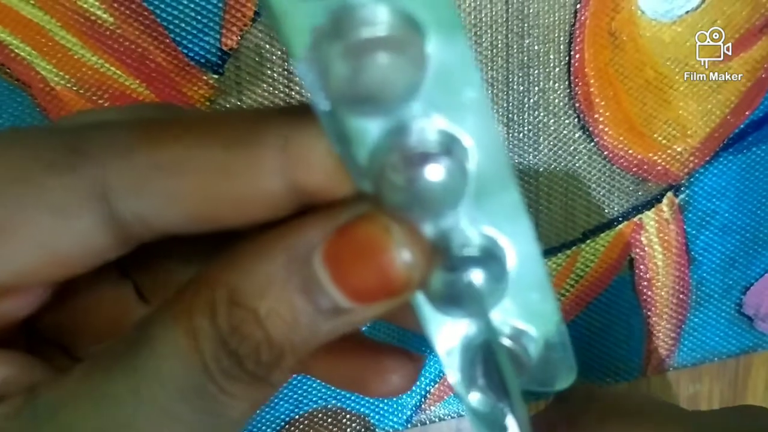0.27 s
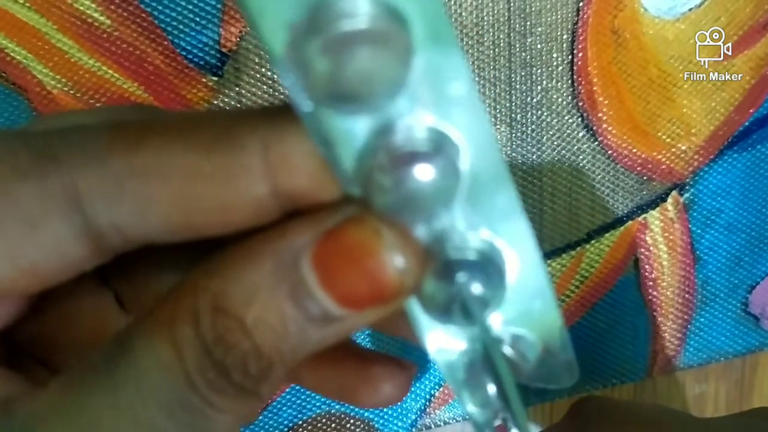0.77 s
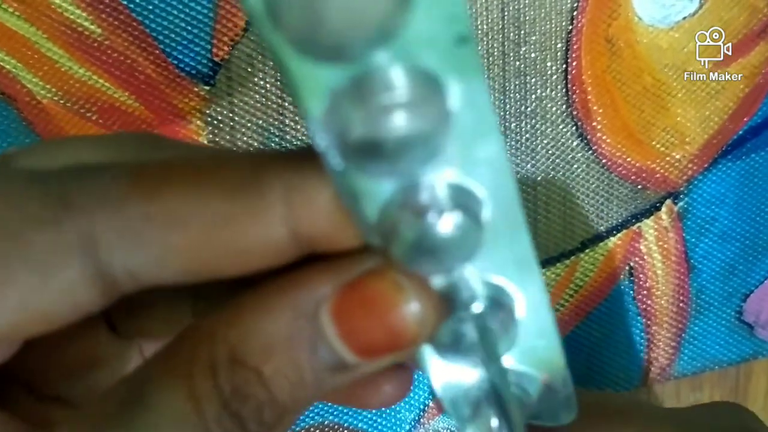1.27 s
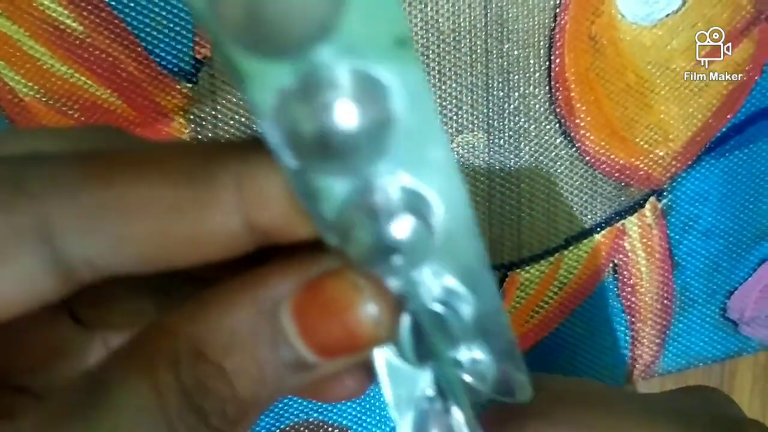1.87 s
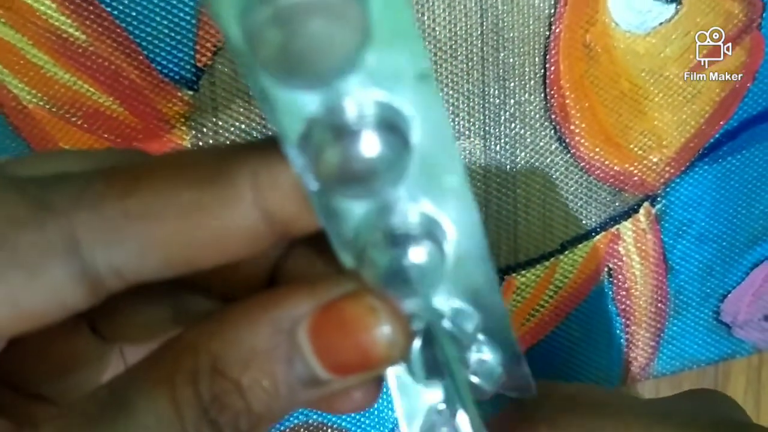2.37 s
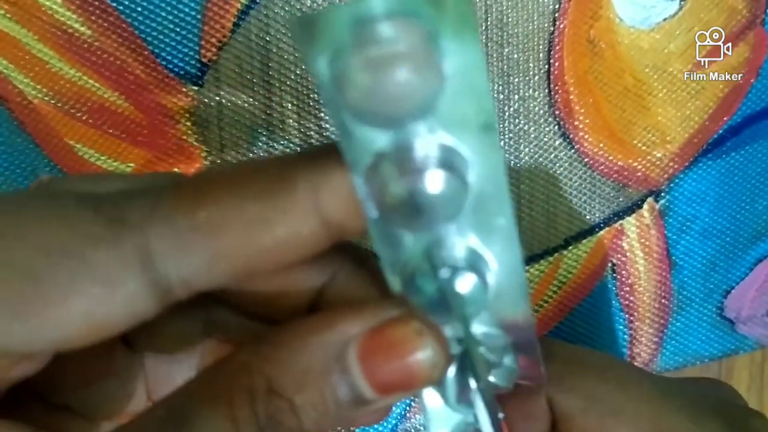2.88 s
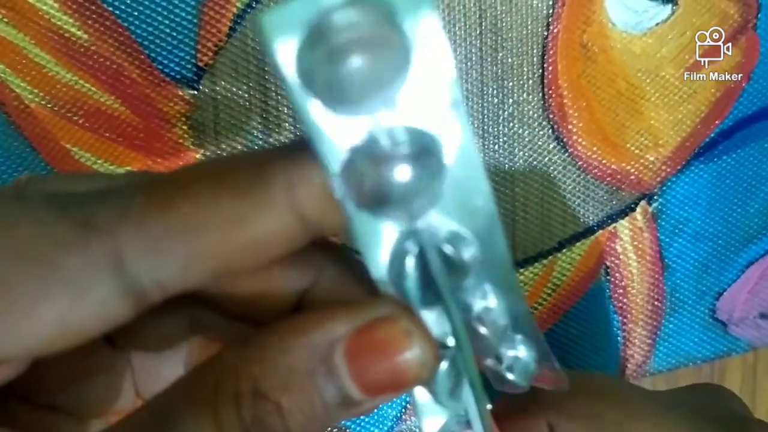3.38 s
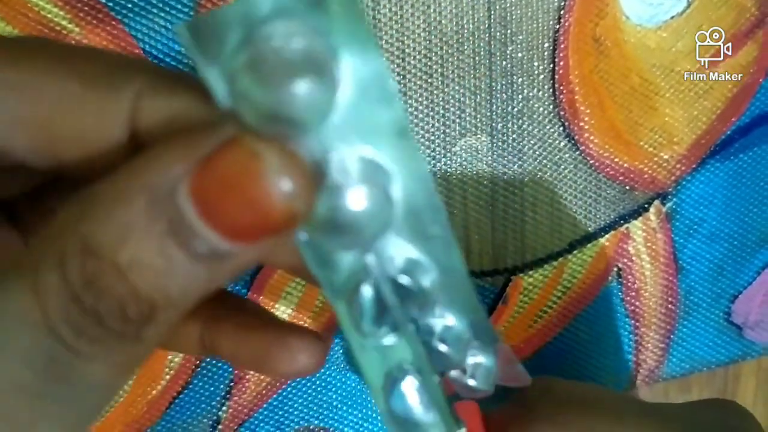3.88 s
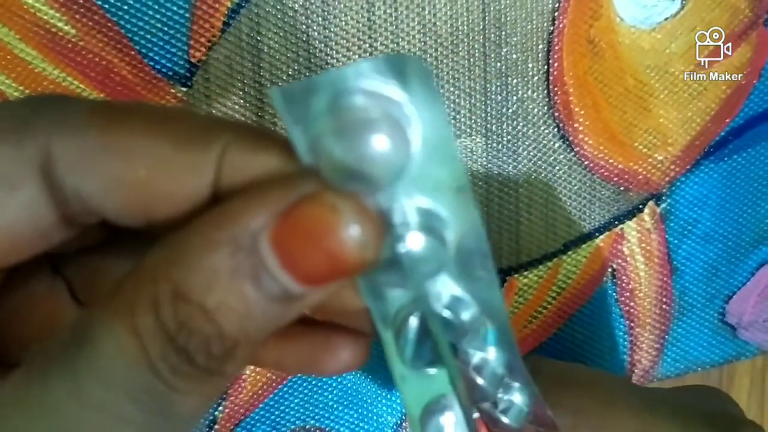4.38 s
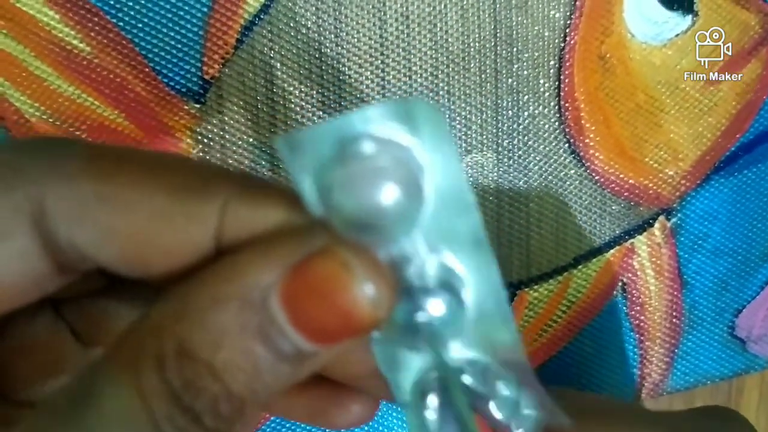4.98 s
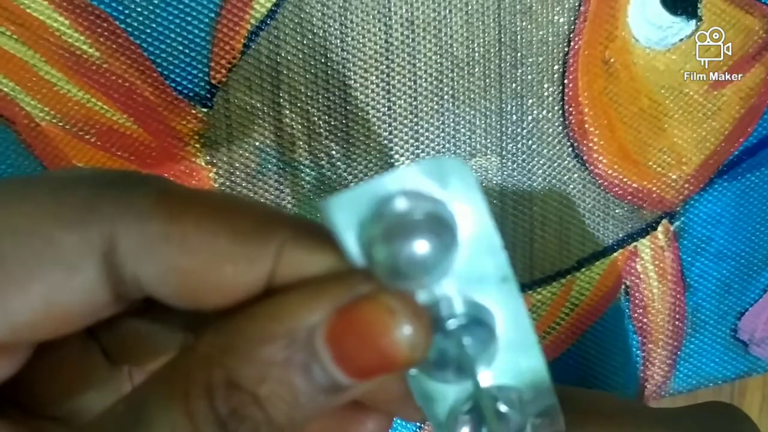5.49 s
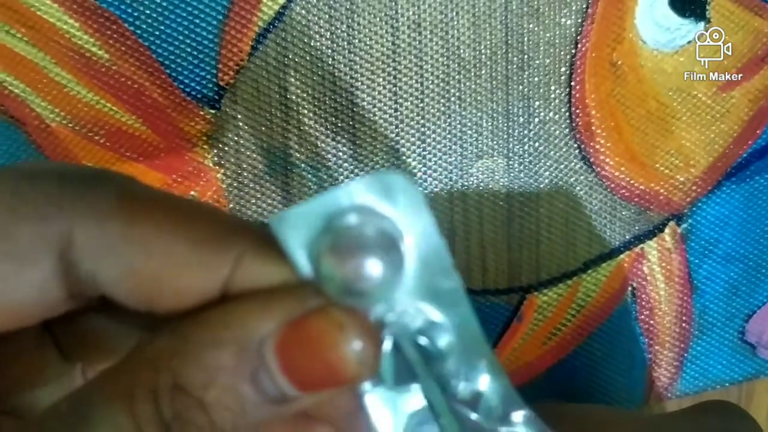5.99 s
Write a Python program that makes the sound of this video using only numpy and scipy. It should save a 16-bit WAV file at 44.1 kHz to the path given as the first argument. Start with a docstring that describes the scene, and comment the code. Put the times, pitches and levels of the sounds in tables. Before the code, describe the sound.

Close, irregular plastic cracks, foil ticks and brief blade scrapes as scissors cut a blister pack in a quiet small room.

```python
"""Scissors through a blister strip

A small room, a phone's stereo microphone a hand's width from a foil and plastic blister strip.
The plastic gives way in sharp, dry snaps and its domes ping as they buckle. The blades scrape in
short gritty strokes, the foil ticks, the pivot squeaks once. The room answers briefly, over soft
noise and a faint mains hum."""
import sys
import numpy as np
from scipy import signal
from scipy.fft import rfft, irfft, next_fast_len
from scipy.io import wavfile
from scipy.ndimage import uniform_filter1d, map_coordinates

SR = 44100
rng = np.random.default_rng(int(sys.argv[2]) if len(sys.argv) > 2 else 0)


def unload_wav(signal):
    """Save mono or channel-first audio to the path in sys.argv[1] as 16-bit WAV at rate SR, clipped to [-1, 1]."""
    wavfile.write(
        sys.argv[1],
        SR,
        np.round(np.clip(np.atleast_2d(signal).T, -1, 1) * 32767).astype(np.int16),
    )


N = 275095
TIME = np.arange(N) / SR


# Cracks in the plastic, a hand's width from the microphone:
# t/s, level/dB, knock/dB, flex/dB, foil brightness/dB, left-right/dB, tear length/s
PLASTIC_SNAPS = [(0.108, -41, -13, -1, -8, -1, 0.0042), (0.682, -43.5, -21, -11.5, -1, 5, 0.0014),
                 (0.749, -10, -18, -9.5, 0, 2.5, 0.0023), (0.8634, -32, -12.5, -14, -2, -2.5, 0.0048),
                 (0.8716, -11.5, -29, -17, -20, 1, 0.00049), (1.048, -39.5, -15, -14, -11, 4, 0.0028),
                 (1.4054, -54, -4, -5, -2, -2, 0.00046), (1.4287, -45, -16, -11, -8, 4, 0.00058),
                 (1.4633, -57, -7, -1, -10, -1, .0005), (1.84, -55, -12, -4.5, -15, -2, .0008),
                 (1.934, -49, -17.5, -7, -17, -2, .0007), (2.0144, -16, -41.5, -21, -5, 0, .0013),
                 (2.0181, -10.5, -41, -24, -9.5, 3.5, 0.0013), (2.0274, -11.5, -36.5, -18, -10, -3, 0.001),
                 (2.2893, -7, -23, -17.5, -11.5, 0.5, 0.00036), (2.5325, -43, -9.5, -3.5, -1, -9, 0.00074),
                 (2.548, -18, -25.5, -14, -18, 5, 0.00059), (2.5607, -33, -7.5, -10, -3, 0, .0019),
                 (2.6554, -16.5, -41, -11.5, -10, 2.5, 0.001), (2.7811, -17.5, -28.5, -17, -6, 2, 0.00041),
                 (3.101, -34.5, -30, -19.5, -22.5, 0, .004), (3.4032, -30.5, -27, -15, -10, 7, 0.00074),
                 (3.6119, -52.5, -11, -13.5, -6, 0, .002), (4.204, -36, -16.5, -11, -3.5, -2.5, 0.0037),
                 (4.215, -30, -26, -11.5, -7, 1, .003), (4.2582, -6.5, -24.5, -9.5, -3.5, 0.5, 0.0054),
                 (4.4134, -38.5, -23, -11, -11, 6, 0.0011), (4.4375, -32.5, -22, -13, -27, 2, .0011),
                 (4.4532, -34.5, -23.5, -2.5, -14, 4, .0018), (4.5651, -41.5, -8, -10, -21, -1, .0004),
                 (4.5727, -36.5, -14, -6.5, -14, 3, 0.0013), (4.6135, -28, -28.5, -17.5, 6, 6, .0007),
                 (4.635, -18.5, -24.5, -14, -8, -3.5, 0.0028), (4.8351, -36, -23, -12, -9, -3, 0.0024),
                 (4.8939, -53.5, -8, 4, -10, 2, .0012), (4.9191, -44.5, -16, -5.5, -9, -3, .0008),
                 (4.9364, -38, -20, -9, -19, 1, 0.00054), (4.9761, -33, -33, -13, -4, -7, .0012),
                 (4.985, -28, -35, -10, 3, 3, 0.0018), (4.996, -24, -22, -10, -13, -1.5, 0.0015),
                 (5.1661, -32, -21.5, -13, -7.5, 0.5, 0.0019), (5.204, -48, -10, -2, -13, 3, .003),
                 (5.2764, -23.5, -20, -7, -17.5, 4, .0021), (5.3151, -16.5, -24.5, -15, -6, 0.5, 0.0007),
                 (5.8072, -37.5, -27, -8.5, -10, 0, 0.00087), (5.8246, -31, -17.5, -8.5, -9, 1.5, 0.0006),
                 (6.0985, -39.5, -10, -9.5, -19.5, -4, 0.0011)]
# What a crack radiates: f/Hz, level/dB
CRACK_SPECTRUM = [(25, -11.5), (70, 2.5), (350, -2), (900, 12), (1400, 6), (2300, -1), (4200, 3),
                  (5200, -7), (6600, -6), (7600, -3.5), (9000, 0.5), (12000, 2.5), (15500, -8),
                  (17000, -12)]

def snaps(room_db=-2, size=2048):
    """Each crack or tick mixes low knock, flexing plastic and bright foil; gives (to mic, to room)."""
    to_mic, to_room = np.zeros((2, 2, N))
    hz = np.fft.rfftfreq(size, 1 / SR)
    for s, db, knock_db, flex_db, foil_db, pan_db, length in PLASTIC_SNAPS + foil_ticks():
        tone = [(1600, knock_db), (2200, flex_db), (4300, flex_db),
                (5600, 0.33), (10000, 0.0061), (12800, foil_db)]
        colour_db = 23.5 + along(CRACK_SPECTRUM, hz) + along(tone, hz) + folds(hz)
        crack = irfft(tear(length, size) * causal(amp(db + colour_db)))
        add(to_mic, s, crack * amp([[pan_db / 2], [-pan_db / 2]]))
        add(to_room, s, crack * amp(room_db))
    return to_mic, to_room


def tear(length, size, t60=0.01, shared_hz=300):
    """Stereo spectrum of one crack: it gathers speed, runs its length, then the sheet damps it."""
    t, hz = np.arange(size) / SR, np.fft.rfftfreq(size, 1 / SR)
    onset = 1 - np.exp(-t / (.3 * length))
    decay = amp(-60 * np.maximum(t - length, 0) / t60)
    mid, side = rfft(rng.standard_normal((2, size)) * onset * decay)
    burst = mid + np.outer([1, -1], hz / (hz + shared_hz)) * side  # long waves reach both ports alike
    # so short a break excites all pitches about equally
    power = np.abs(uniform_filter1d(np.abs(burst) ** 2, size=36))
    return burst * causal(1 / np.sqrt(power + 1e-12))


def folds(hz, spacing_hz=330, depth_db=3):
    """The sheet buckles into a new shape each time, so its resonances fall at new pitches (dB)."""
    knots = rng.standard_normal(SR // spacing_hz)
    return depth_db * map_coordinates(knots, [hz / spacing_hz]) * hz / (hz + 4 * spacing_hz)


# Blister domes buckling, each at its own pitch: t/s, level/dB, f/Hz
DOME_POPS = [(.7492, -11, 6680), (2.2899, -17.5, 4230), (2.548, -41.5, 957), (2.562, -42, 834),
             (2.6558, -30.5, 3440), (2.7806, -18, 10950), (3.741, -56, 1150), (4.26, -30.5, 1052),
             (4.997, -46.5, 778), (5.278, -46, 770), (6.099, -53, 1100)]

def dome_pops(t60_cycles=49):
    """Buckling blisters ring: small stiff folds ping briefly, wide domes sound hollow and longer."""
    out, t = np.zeros(N), np.arange(SR // 4) / SR
    for s, db, hz in DOME_POPS:
        add(out, s, amp(db - 60 * t * hz / t60_cycles) * np.sin(2 * np.pi * hz * t))
    return out


# Blades rubbing the strip, close up: start t/s, hardest t/s, end t/s, level/dB, hollow tone/dB
BLADE_STROKES = [(.11, 0.137, 0.21, -46.5, -15.5), (.41, 0.496, .67, -81, 3), (.756, 0.77, 0.8, -35, -16),
                 (1.043, 1.071, 1.136, -36, -23), (1.23, 1.245, 1.262, -49, -16),
                 (1.359, 1.403, 1.57, -66.5, -7), (1.579, 1.626, 1.695, -55.5, -7),
                 (1.959, 2.01, 2.03, -32.5, -19), (2.297, 2.304, 2.34, -31, -32),
                 (2.438, 2.491, 2.49, -47, -12.5), (2.545, 2.548, 2.598, -36, -10.5),
                 (2.981, 2.992, 3.1, -61.5, -7), (3.091, 3.126, 3.209, -38, -20),
                 (3.258, 3.351, 3.356, -50, -13), (3.70, 3.748, 3.77, -53, -5),
                 (3.857, 3.902, 4.0, -67, -20.5), (4.194, 4.219, 4.316, -39, -14),
                 (4.38, 4.431, 4.49, -46.5, -13), (4.562, 4.567, 4.6, -48.5, -4.5),
                 (4.849, 4.944, 5, -52, -11), (4.969, 4.999, 5.015, -32, -22),
                 (5.07, 5.101, 5.12, -50, -13.5), (5.225, 5.261, 5.30, -38, -16),
                 (5.805, 5.817, 5.855, -48, -11), (5.971, 6.069, 6.06, -59.5, -8.5),
                 (6.098, 6.205, 6.25, -58, -31)]
# What the rubbing radiates: f/Hz, level/dB
SCRAPE_SPECTRUM = [(100, -18), (500, -23), (1000, -17), (1500, -20), (3200, -14.5), (4300, -8),
                   (5200, -7.5), (6500, -4), (9000, -0.5), (11500, -3.5), (15000, -11), (16500, -26)]

def blade_strokes(rise_s=0.0023, fall_s=0.0044, size=12000):
    """The edges grind through the foil, and the blisters hum along."""
    out, hz = np.zeros((2, N)), np.fft.rfftfreq(size, 1 / SR)
    for start, hardest, end, db, hollow_db in BLADE_STROKES:
        t = start - rise_s + np.arange(size) / SR
        gate = np.clip((t - start) / rise_s + .5, 0, 1) * np.clip((end - t) / fall_s + .5, 0, 1)
        force = gate * amp(force_db(t, start, hardest, end, db))
        grains = rfft(grit(size))
        edge = unit(irfft(grains * causal(amp(along(SCRAPE_SPECTRUM, hz) + folds(hz)))))
        body = unit(irfft(grains * hollow(hz)))
        add(out, start - rise_s, force * (edge + amp(hollow_db) * body))
    return out


def force_db(t, start, hardest, end, db, swell_db=16, ease_db=13.5):
    """The hand bears down, then eases off."""
    return db - np.interp(t, [start, hardest, end], [swell_db, 0, ease_db])


def grit(size, rough_db=4.6, grain_hz=800):
    """Stick and slip: noise broken into grains of very unequal size."""
    grains = map_coordinates(rng.standard_normal(size), [np.arange(size) * grain_hz / SR])
    return unit(rng.standard_normal((2, size)) * amp(rough_db * np.minimum(grains, 2)))


# Hollows of the blisters and the cupped hand: f/Hz, width/Hz, level/dB
CAVITIES = [(790, 240, -6.5), (1075, 300, -2)]

def hollow(hz):
    """Resonances of the air held by blisters and hand."""
    return sum((-1) ** k * amp(db) * 1j * hz * width / (centre ** 2 - hz ** 2 + 1j * hz * width)
               for k, (centre, width, db) in enumerate(CAVITIES))


# One tick of the foil: knock/dB, flex/dB, foil brightness/dB, tear length/s
FOIL_TICK = (-13, -8.5, -10.5, 0.03)

def foil_ticks(per_stroke=3, tick_db=-48, typical_force_db=-48.5, growth=.7, scatter_db=2.5):
    """The foil ticks mostly and loudest where the force is high; gives rows like PLASTIC_SNAPS."""
    knock_db, flex_db, foil_db, length = FOIL_TICK
    rows = []
    for start, hardest, end, db, _ in BLADE_STROKES:
        for when, loud, side in rng.standard_normal((per_stroke, 3)):
            s = np.interp(when, [-2, 0, 2], [start, hardest, end])
            excess_db = force_db(s, start, hardest, end, db) - typical_force_db
            level_db = tick_db + growth * excess_db + scatter_db * loud
            rows.append((s, level_db, knock_db, flex_db, foil_db, 3 * side, length))
    return rows


# The strip bending between fingers and blades: f/Hz, level/dB, t60/s
BENDING_MODES = [(180, -24, 0.025), (360, -16, .015), (540, -8.5, 0.0064), (1300, -3.5, .006),
                 (3810, -9, .05)]
# Fingertips shifting their grip: t/s, level/dB
GRIP_SHIFTS = [(0.407, -42), (.98, -37.5), (2.994, -42)]

def strip_bending(finger_hz=383, scatter_db=1.5):
    """Quickly damped swings: a crack's knock starts all modes, a soft fingertip only the low ones."""
    out, t = np.zeros(N), np.arange(SR // 4) / SR
    hz, mode_db, t60 = np.transpose(BENDING_MODES)
    modes = amp(mode_db[:, None] - 60 * t / t60[:, None]) * np.sin(2 * np.pi * hz[:, None] * t)
    knocks = [(s, amp(db + knock_db)) for s, db, knock_db, *_ in PLASTIC_SNAPS]
    nudges = [(s, amp(db) / (1 + (hz / finger_hz) ** 4)) for s, db in GRIP_SHIFTS]
    for s, push in knocks + nudges:
        weights = push * amp(scatter_db * rng.standard_normal(len(hz)))
        add(out, s, weights @ modes)
    return out


# The pivot as the blades open: t/s, level/dB
SQUEAK_LEVEL = [(.31, -100), (.35, -76), (.41, -75), (.47, -86), (.53, -86), (.58, -105)]

def pivot_squeak(pitch_hz=4210):
    """Steel slides on steel: a thin unsteady tone with its octave."""
    phase = 2 * np.pi * np.cumsum(pitch_hz * (1 + .02 * wobble(700))) / SR
    level = amp(np.interp(TIME, *np.transpose(SQUEAK_LEVEL))) * (TIME < SQUEAK_LEVEL[-1][0])
    return level * (np.sin(phase) + .7 * np.sin(2 * phase))


# The strip as the microphone's two ports hear it: f/Hz, left-right/dB
PORT_BALANCE = [(100, -3.5), (600, -5), (2000, -3), (4000, -7), (8000, -1), (12000, 1.5)]

def mic_ports(x, lag_s=.00018):
    """The left port lies farther from the strip and hears it a little later."""
    def response(hz):
        balance = amp(np.outer([1, -1], along(PORT_BALANCE, hz)) / 2)
        delay = np.exp(np.outer([-1, 1], 1j * np.pi * hz * lag_s))
        return balance * delay
    return filtered(x, response)


# Decay of the small room: f/Hz, t60/s
ROOM_DECAY = [(200, 0.23), (1000, .3), (4000, 0.24), (9000, 0.23), (15000, 0.22)]
# Its echo at the microphone: f/Hz, level/dB
ECHO_LEVEL = [(150, -15), (600, -23), (1200, -15), (3000, -7.5), (7000, -11), (11000, -9.5), (15000, -7)]

def room_echo(x, build_s=0.0047):
    """The echo thickens over the first few metres, then dies, the midrange last."""
    hz, t, noise = signal.stft(rng.standard_normal((2, SR // 2)), SR, nperseg=256)
    decay = amp(-60 * t / along(ROOM_DECAY, hz)[:, None])
    tail = signal.istft(noise * decay, SR, nperseg=256)[1]
    tail *= 1 - np.exp(-np.arange(tail.shape[1]) / SR / build_s)
    wet = signal.fftconvolve(x, tail / np.linalg.norm(tail[0]), axes=1)[:, :N]
    return filtered(wet, lambda f: amp(along(ECHO_LEVEL, f)))


# Noise of the room around the microphone: f/Hz, relative level/dB
AIR_SPECTRUM = [(12, -45.5), (20, -6), (107, 0), (150, -11.5), (210, -8.5), (642, -19), (698, -18),
                (759, -18), (1480, -22.5), (2910, -23), (4060, -25.5), (4420, -24), (11800, -23),
                (16000, -33.5)]
# How alike that noise is at the two ports: f/Hz, correlation
AIR_LIKENESS = [(50, 0.41), (200, 0.75), (600, .3), (2000, 0.033)]
# Mains hum in the background: f/Hz, level/dB
MAINS_HUM = [(100, -73), (200, -82.5), (300, -85.5), (700, -89.5)]

def room_tone(air_db=-68):
    """Room noise, most alike at both ports in the bass, and a slightly unsteady mains hum."""
    def mid_and_side(hz):
        angle = np.arccos(np.clip(along(AIR_LIKENESS, hz), -1, 1)) / 2
        return amp(along(AIR_SPECTRUM, hz)) * [np.cos(angle), np.sin(angle)]
    mid, side = filtered(rng.standard_normal((2, N)), mid_and_side)
    air = amp(air_db) * unit(np.array([mid + side, mid - side]))
    hum = sum(np.sqrt(2) * amp(db + wobble(2.5)) * np.sin(2 * np.pi * hz * TIME + 0.17 * wobble(1.3))
              for hz, db in MAINS_HUM)
    return (air + hum) * amp([[.7], [-.7]])  # a touch louder on the left


def amp(db):
    """Decibels to gain."""
    return 10 ** (np.asarray(db) / 20)


def unit(x):
    """Scale to rms 1."""
    return x / np.sqrt(np.mean(x ** 2) + 1e-20)


def along(points, hz):
    """Read (f/Hz, value) points on a log axis."""
    f, values = np.transpose(points)
    return np.interp(np.log(hz + 1), np.log(f), values)


def wobble(rate):
    """A smooth random curve, rate knots a second."""
    return map_coordinates(rng.standard_normal(int(N * rate / SR) + 4), [TIME * rate])


def filtered(x, response):
    """Pass x through a response given as a function of frequency."""
    size = next_fast_len(N + SR // 2)
    return irfft(rfft(x, size) * response(np.fft.rfftfreq(size, 1 / SR)), size)[..., :N]


def causal(gain):
    """The response with this gain that never sounds before its cause."""
    cepstrum = irfft(np.log(gain + 1e-6))
    half = cepstrum.shape[-1] // 2
    return np.exp(rfft(cepstrum * np.r_[1, np.full(half - 1, 2), np.zeros(half)]))


def add(track, s, sound):
    """Mix a sound into a track at s seconds."""
    part = track[..., round(s * SR):][..., :sound.shape[-1]]
    part += sound[..., :part.shape[-1]]


def scene():
    """Cuts close to the microphone, the room around them and the hum behind."""
    to_mic, to_room = snaps()
    handling = strip_bending() + dome_pops() + blade_strokes() + pivot_squeak()
    return mic_ports(to_mic + handling) + room_echo(to_room + handling) + room_tone()


def record(dry, bass_hz=32, ceiling=.88, top_hz=16700):
    """The phone drops the deepest bass, rounds off the tallest peaks and cuts the highest treble."""
    thin = filtered(dry, lambda hz: hz ** 4 / (hz ** 4 + bass_hz ** 4))
    rounded = thin / (1 + (thin / ceiling) ** 6) ** (1 / 6)
    return filtered(rounded, lambda hz: np.clip((top_hz - hz) / 400 + .5, 0, 1))


dry = scene()
out = record(dry)
unload_wav(out)
```